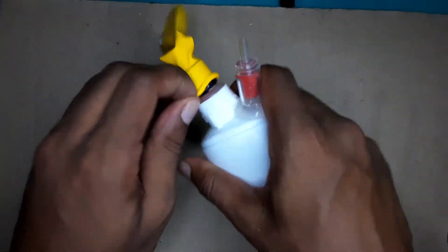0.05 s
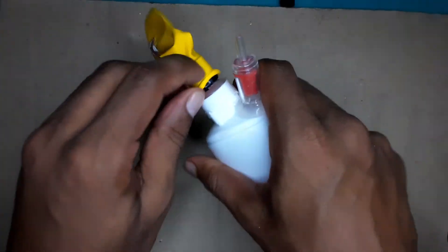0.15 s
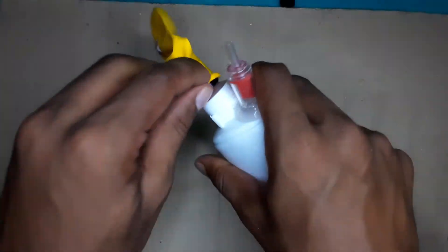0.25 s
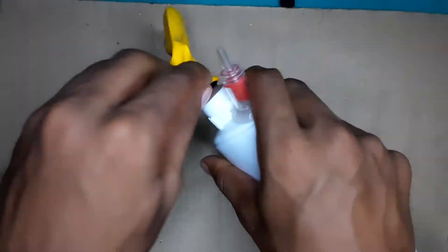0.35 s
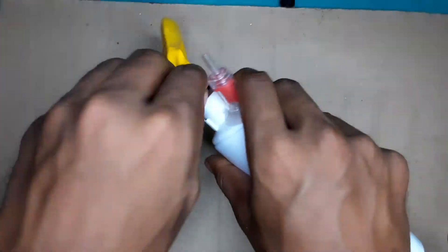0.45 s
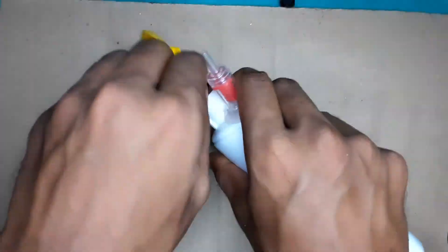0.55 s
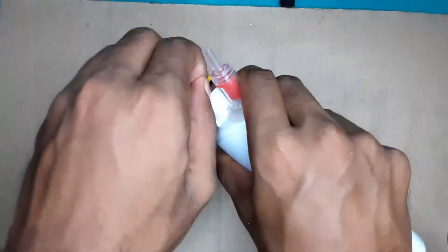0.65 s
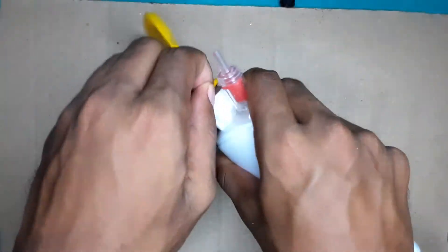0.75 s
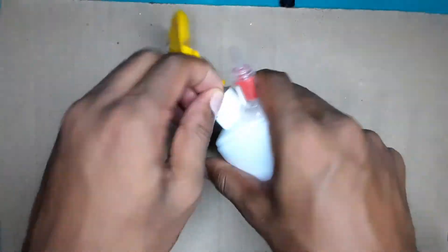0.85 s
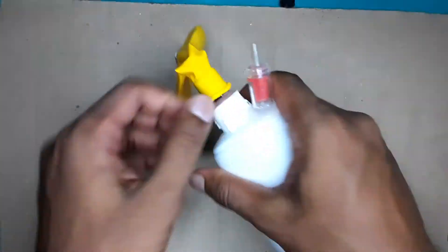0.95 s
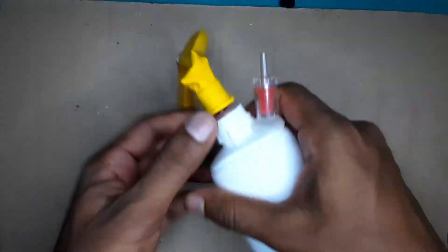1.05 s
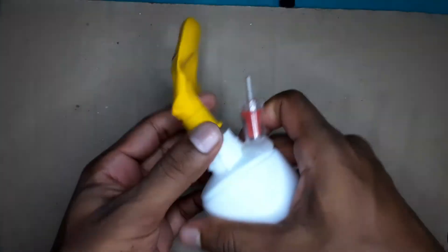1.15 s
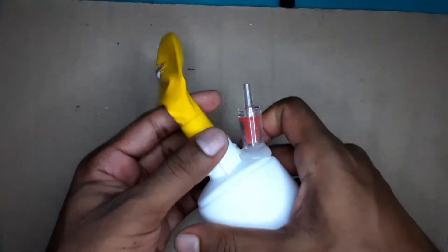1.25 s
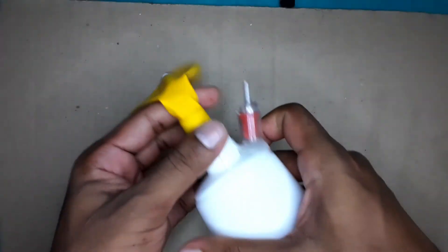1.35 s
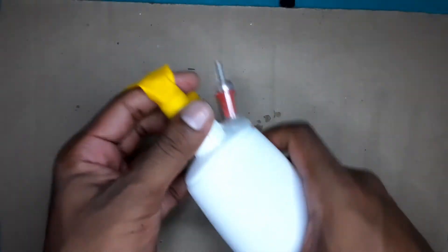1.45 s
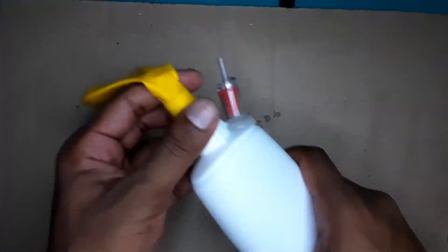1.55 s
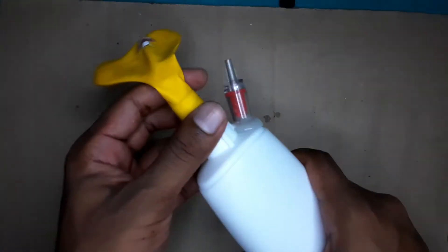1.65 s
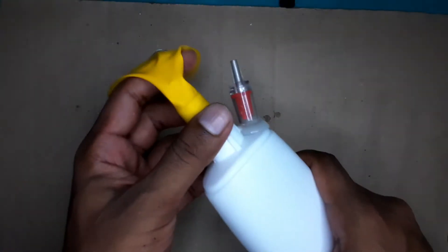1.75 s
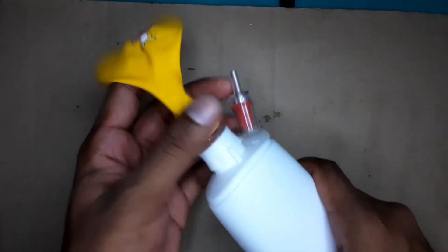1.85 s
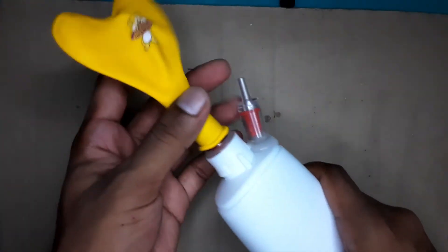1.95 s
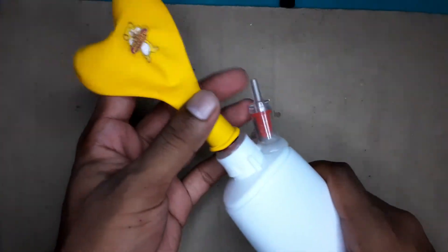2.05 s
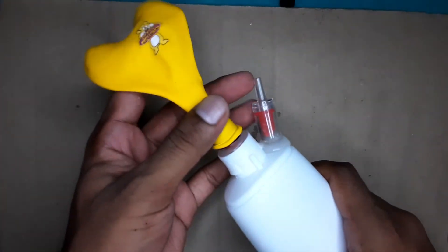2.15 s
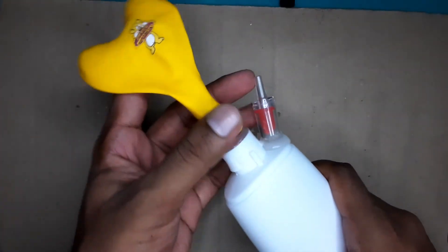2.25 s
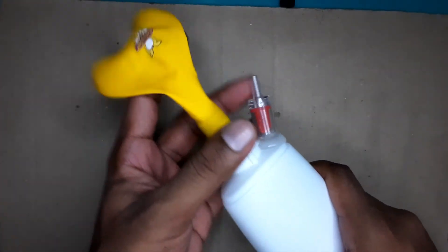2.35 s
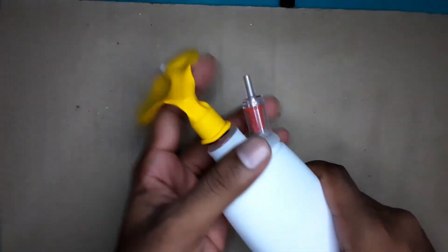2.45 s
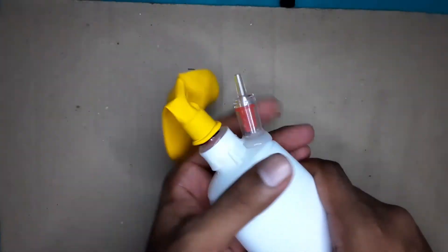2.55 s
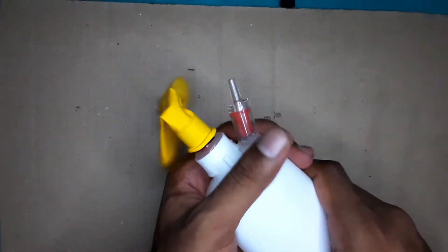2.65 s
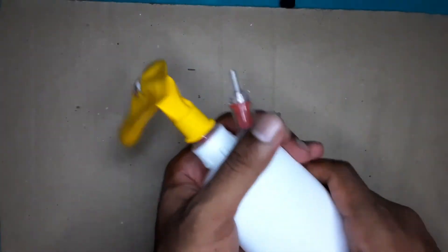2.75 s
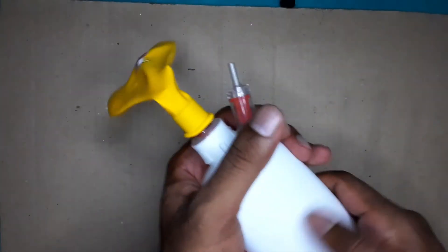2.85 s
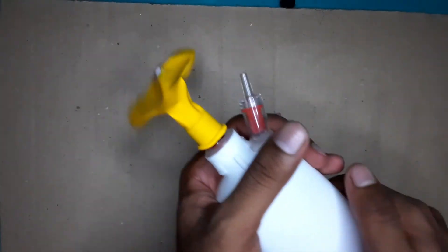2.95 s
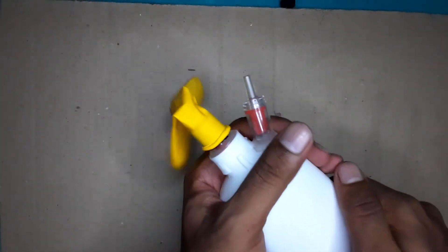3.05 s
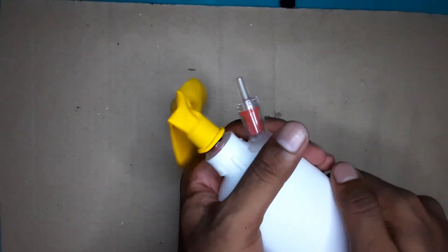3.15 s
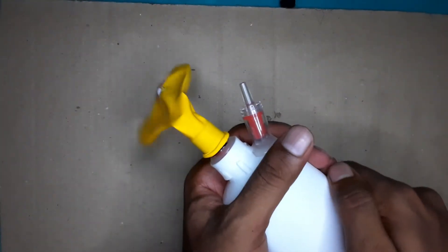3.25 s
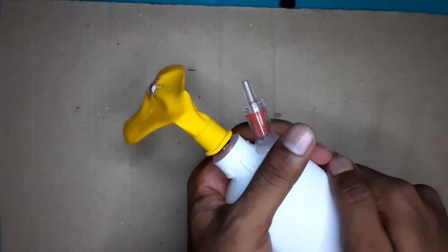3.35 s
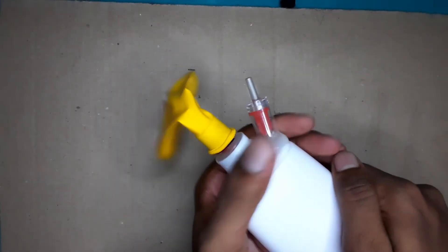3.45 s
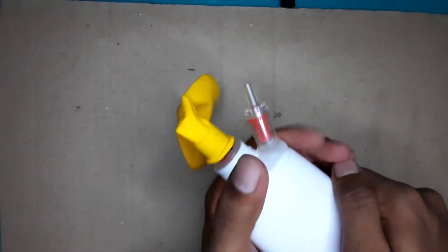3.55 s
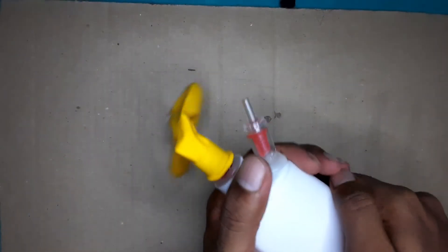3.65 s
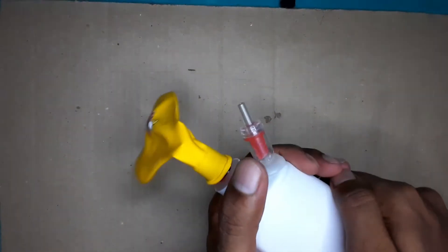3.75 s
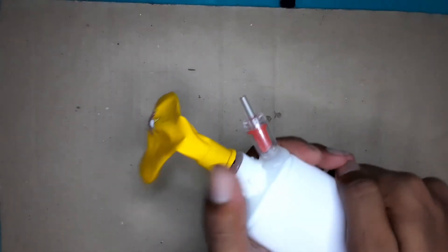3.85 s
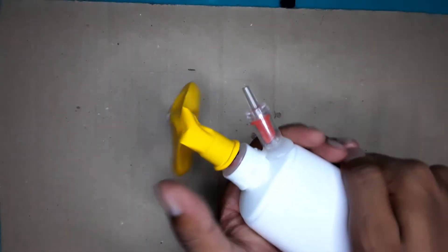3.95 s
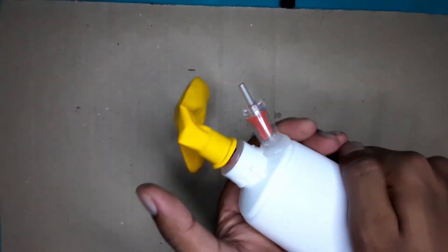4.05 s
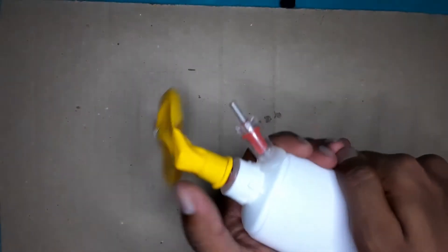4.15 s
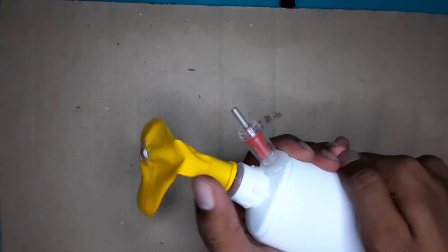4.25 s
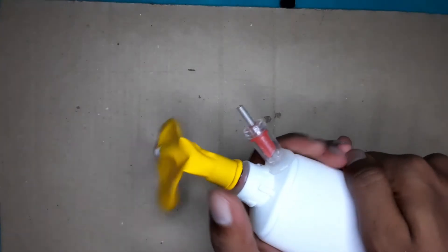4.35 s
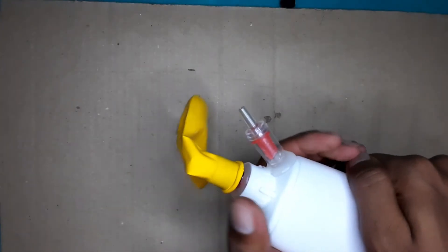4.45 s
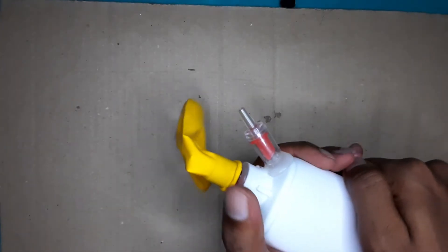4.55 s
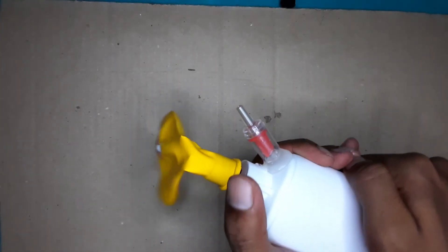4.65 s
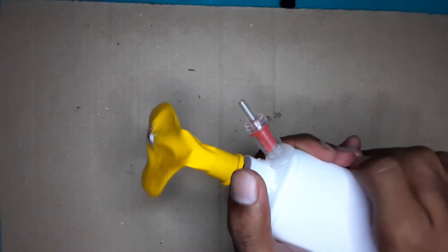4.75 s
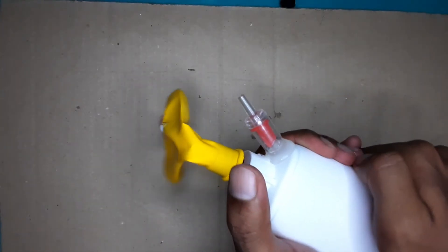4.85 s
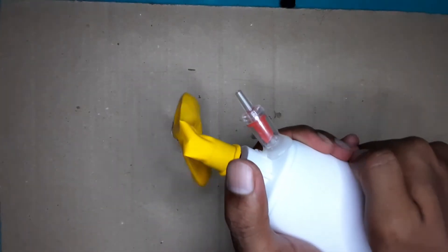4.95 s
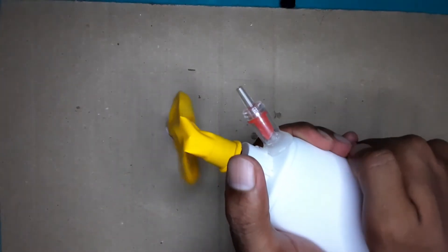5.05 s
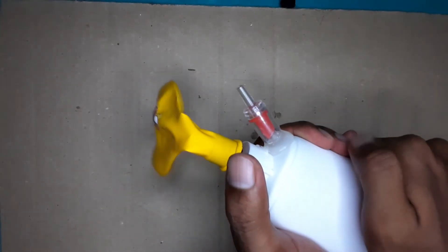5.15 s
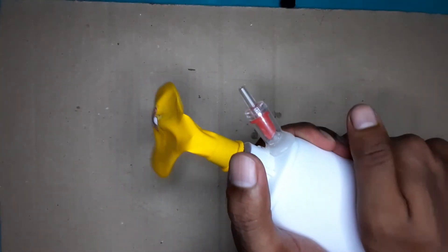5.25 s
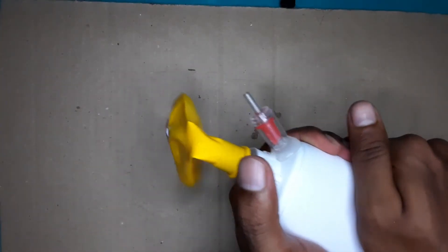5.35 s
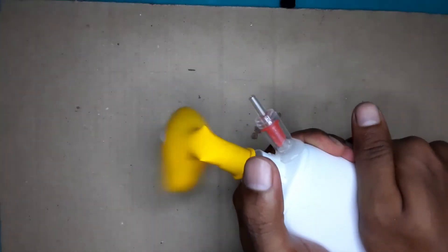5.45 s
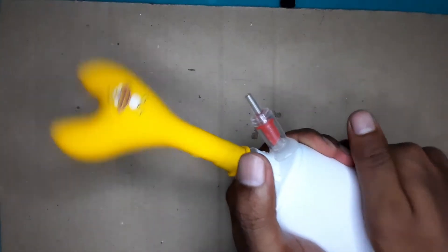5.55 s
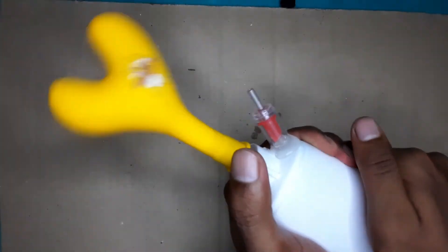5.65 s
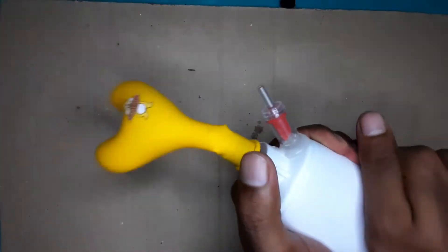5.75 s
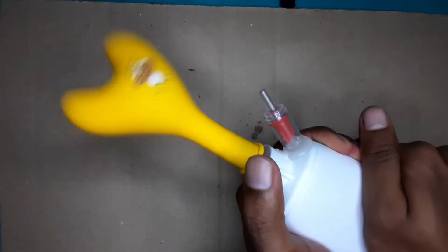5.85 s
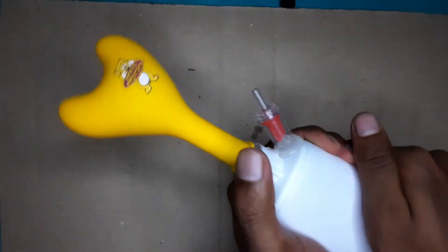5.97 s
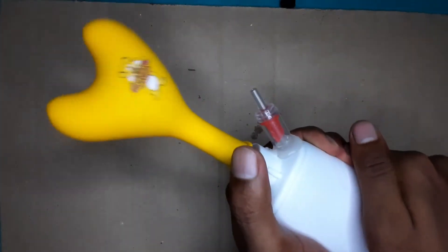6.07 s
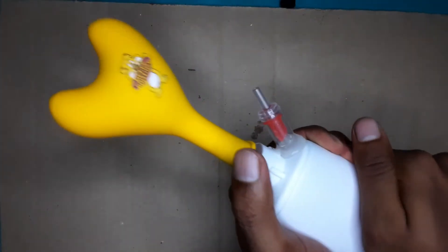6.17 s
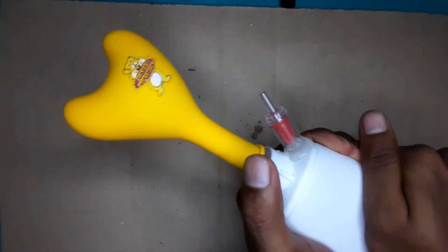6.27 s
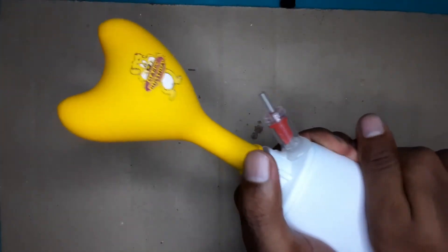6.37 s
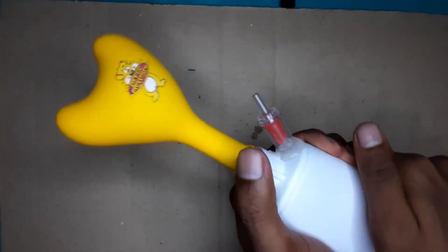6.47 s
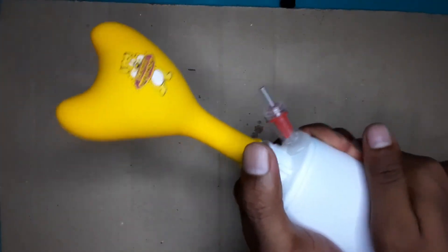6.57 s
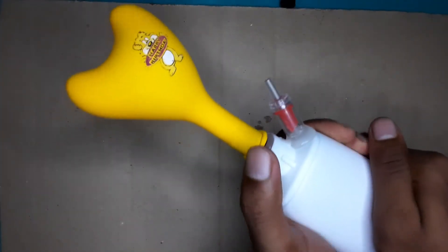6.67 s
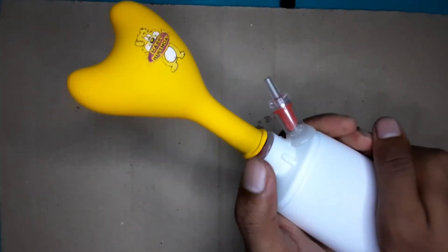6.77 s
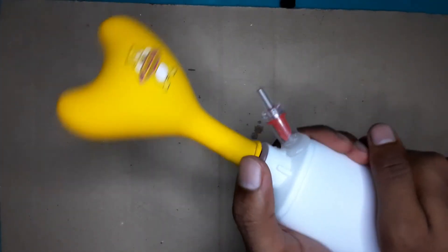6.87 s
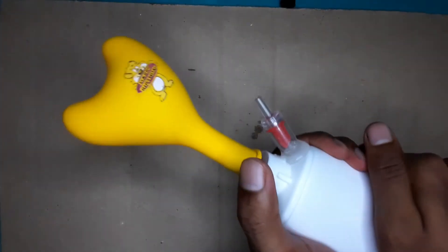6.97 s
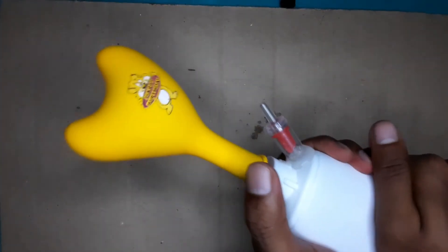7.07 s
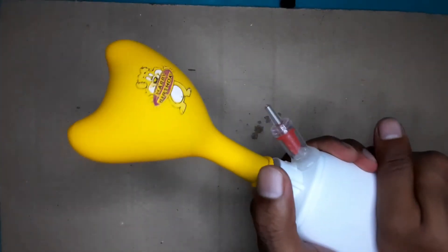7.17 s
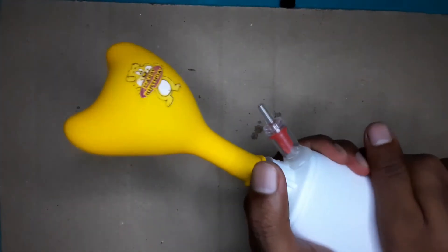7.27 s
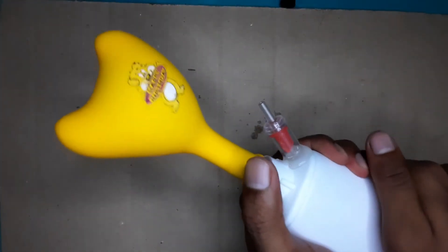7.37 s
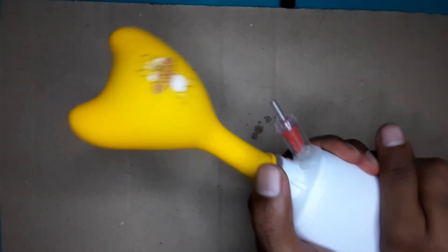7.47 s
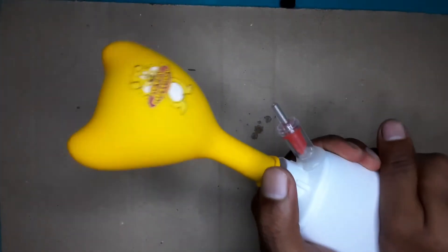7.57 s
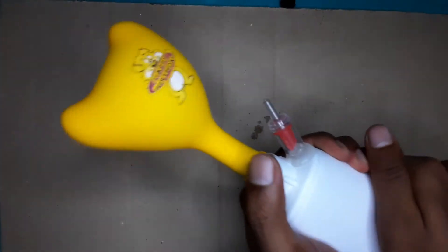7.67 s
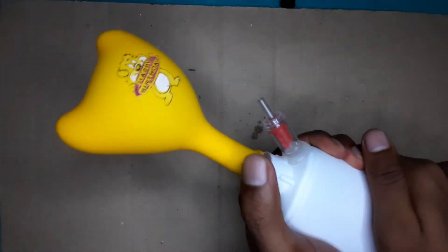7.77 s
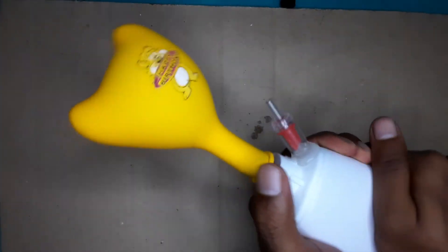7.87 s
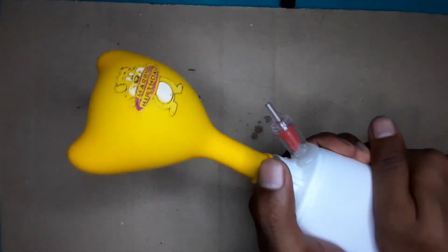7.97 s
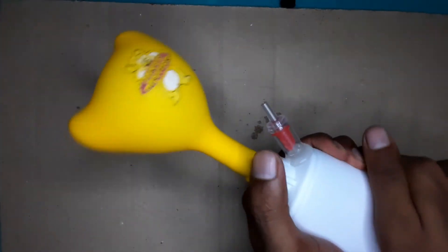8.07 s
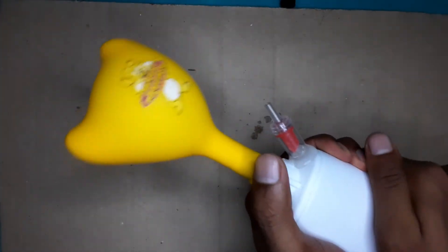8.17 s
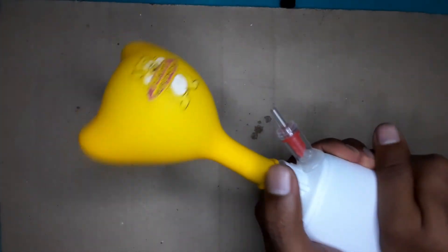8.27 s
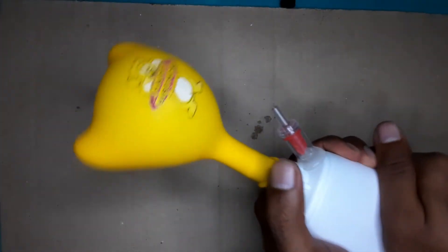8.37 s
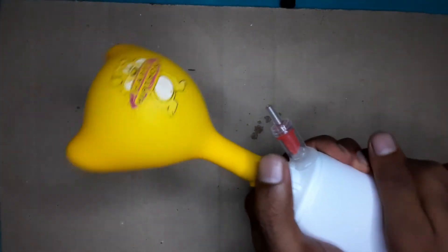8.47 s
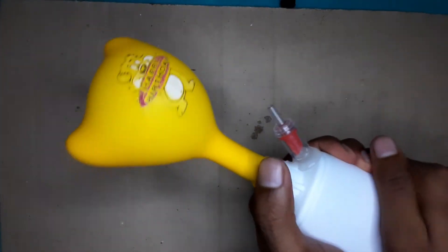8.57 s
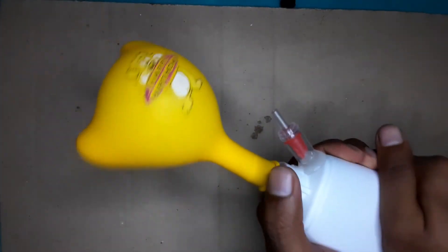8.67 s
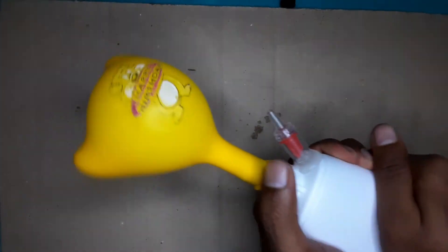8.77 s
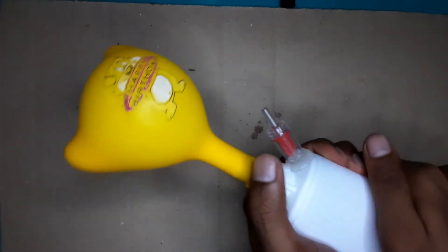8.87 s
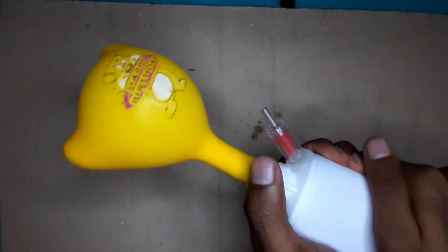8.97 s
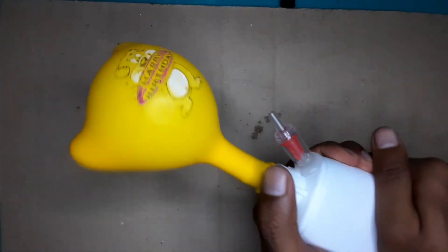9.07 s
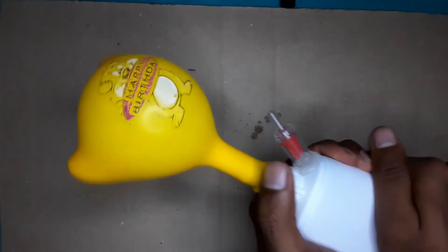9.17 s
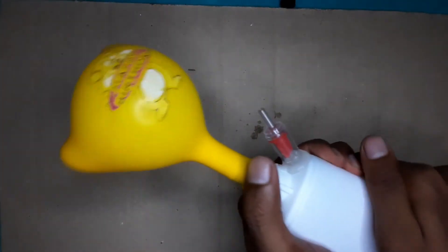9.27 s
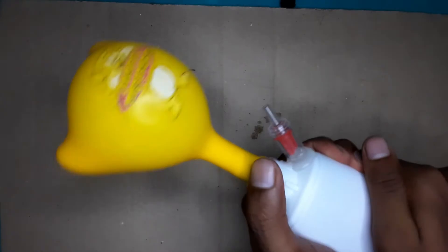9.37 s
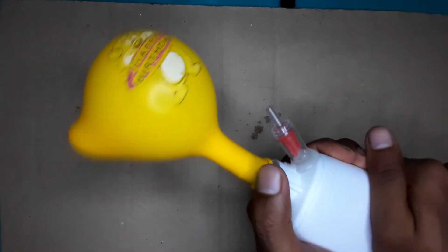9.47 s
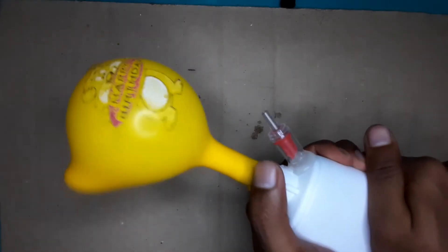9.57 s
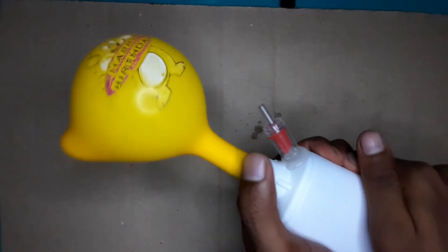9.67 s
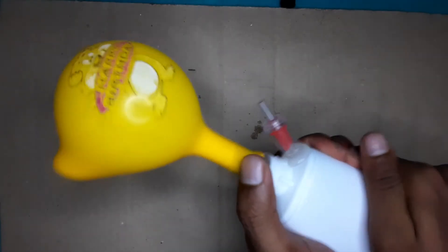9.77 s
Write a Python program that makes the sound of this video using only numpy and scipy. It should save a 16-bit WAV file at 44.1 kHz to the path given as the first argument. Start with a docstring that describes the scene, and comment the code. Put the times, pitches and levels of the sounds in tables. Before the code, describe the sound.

Fingers rub and creak a rubber balloon onto a plastic bottle, then repeated squeezes hiss air into it over a faint fan hum.

```python
"""Fingers rub, creak and click on rubber and plastic, close by in a small room where a fan hums.
They work a toy balloon onto a squeeze bottle's nozzle, and stick-slip friction makes the skin rasp.
Then ten squeezes hiss into the balloon: each turbulent jet is coloured by resonances and echoes.
After each one the bottle springs back and sucks air through its inlet valve with a thin whistle;
the plastic wall knocks and crinkles as it buckles."""
import sys
import numpy as np
from scipy import signal
from scipy.fft import rfft, irfft, next_fast_len
from scipy.io import wavfile
from scipy.ndimage import map_coordinates

SR = 44100
rng = np.random.default_rng(int(sys.argv[2]) if len(sys.argv) > 2 else 0)


def generate_wav(signal):
    """Clip the signal to [-1, 1] and save it as 16-bit WAV at the path in sys.argv[1]."""
    frames = np.transpose(np.atleast_2d(signal))
    scaled = np.clip(frames, -1, 1) * 32767
    pcm = np.round(scaled).astype(np.int16)
    wavfile.write(sys.argv[1], SR, pcm)


N = 432621
TIME = np.arange(N) / SR

# Levels are relative within each source.
# squeezes after the first puff: t/s, length/s, level/dB, edge tone f/Hz, valve slit f/Hz,
# neck level/dB, nozzle level/dB, echo delay/s, refill level/dB, wall knock level/dB
SQUEEZES = [ (5.856, .096, -38.5, 7300, 11500, -1.5, 2.5, 0.00086, -48, -60),
            (6.307, 0.087, -37.5, 7800, 11150, -7.5, -3.5, 0.001, -50, -62),
            (7.158, 0.092, -37, 6020, 11200, -11, -6, 0.001, -49.5, -59),
            (7.556, 0.09, -37, 7600, 11060, -2, 3, .001112, -48.5, -67),
            (7.925, .09, -36, 9060, 11300, -6, 0.5, 0.00061, -46.5, -60),
            (8.31, .094, -35.5, 9200, 11160, -1, 2.5, 0.00063, -47, -55.5),
            (8.708, .088, -34.5, 9160, 11000, -5.5, 1, 0.000624, -47, -54.5),
            (9.098, 0.094, -34.5, 7300, 11170, 1.5, -3, .000732, -48, -56),
            (9.52, .099, -35, 8900, 11400, -4, -1.5, 0.00064, -48.5, -58)]
# resonances: f/Hz, width/Hz, level/dB
OUTLET_MODES = [(1280, 200, -20), (1690, 220, -12), (4150, 130, -8), (4520, 200, -13), (10300, 130, -7),
                (12900, 150, -8), (15300, 300, -9)]  # outlet valve
INLET_MODES = [(1264, 140, -9), (1630, 220, -9.5), (2462, 47, -9), (7070, 313, 0), (10840, 210, 2.5),
               (13150, 1030, -5.5)]  # inlet valve
FOLD_MODES = [(1720, 98, 0.5), (2190, 370, -2.5), (3440, 280, -1), (4090, 220, 2), (4960, 280, -5.5),
              (6020, 110, 1), (8230, 220, -4.5), (11000, 180, -1), (11900, 200, -2.5)]  # pockets in the limp balloon
RUBBER_MODES = [(2300, 240, 0.5), (2610, 160, -0.5), (3620, 245, -0.5), (5150, 860, -0.5), (7280, 350, -2)]  # rubber under the fingers
BOTTLE_MODES = [(2140, 230, 0.5), (3510, 250, 2), (5700, 820, -2), (7000, 450, 0.5)]  # rubbed bottle
# broad noise spectra: f/Hz, level/dB
JET_SPECTRUM = [(350, -39.5), (750, -60), (1200, -21), (1900, -19.5), (2500, -32.5), (3300, -12),
                (5200, -18.5), (6600, -22.5), (7600, -16.5), (9500, -17.5), (11400, -3.5), (14000, -14),
                (16000, -21)]  # turbulence at the outlet
PUFF_SPECTRUM = [(350, -11.5), (800, -24), (1200, -16), (2700, -17), (5500, -11), (6900, -12.5), (9000, -8),
                 (13500, -7.5), (15800, -7.5)]  # air entering the limp balloon
SUCTION_SPECTRUM = [(350, -9), (800, -24), (1500, -10), (2800, -24), (3500, -15.5), (6400, -13.5),
                    (7500, -6.5), (8100, -28), (9600, -18.5), (11000, -30), (12000, -31), (14500, -14),
                    (16000, -11)]  # air returning to the bottle
SKIN_SPECTRUM = [(400, -2), (650, 0.5), (900, -37), (1900, -19.5), (2950, -18), (4300, -3.5), (7300, 2),
                 (8300, -14), (12000, -3.5), (15800, -9)]  # sliding skin
CRINKLE_SPECTRUM = [(200, -7), (400, 7), (650, 8), (1000, -2), (1900, 4), (2800, 2.5), (3600, 7.5),
                    (6500, -5), (8500, -22), (15000, -6)]  # denting plastic
RUMBLE_SPECTRUM = [(22, -49.5), (33, -38), (47, -8.5), (62, -12), (85, -9), (120, -8.5), (155, -10),
                   (180, -14.5), (260, -15), (400, -21), (600, -30.5), (800, -43.5), (1500, -52.5),
                   (3000, -89)]  # room rumble
HISS_SPECTRUM = [(700, 2.5), (1500, -2.5), (3000, -7.5), (7000, -11), (8300, -19), (9500, -19),
                 (11000, -7.5), (15500, -6)]  # steady background hiss
# envelopes: t/s, level/dB
PUFF_ENVELOPE = [(5.385, -75), (5.403, -58), (5.421, -45), (5.45, -40.5), (5.478, -35.5), (5.505, -44),
                 (5.53, -54.5), (5.56, -85)]  # the limp balloon fills
DRONE_ENVELOPE = [(0, -71), (3, -68), (4.6, -63.5), (9.8, -61.5)]  # lowest tone of the hum
# noise bursts: t/s, length/s, level/dB
WISPS = [(6.98, .075, -76), (5.368, .045, -66)]  # a light press or release passes air through the inlet
SLIDES = [(0.089, 0.12, -68.5), (.3, .08, -87), (0.622, 0.078, -72), (0.722, 0.09, -78.5),
          (0.903, 0.021, -58.5), (1.136, 0.12, -82), (1.235, 0.33, -79), (1.42, 0.11, -63.5),
          (1.525, 0.07, -57.5), (1.819, .15, -78.5), (2.02, .1, -88), (2.687, 0.098, -80.5),
          (2.777, 0.089, -64), (2.829, 0.056, -61), (2.88, .05, -72), (2.995, .1, -77.5),
          (3.24, 0.18, -76.5), (3.465, 0.073, -73), (3.639, 0.089, -77.5), (3.927, .17, -82),
          (4.201, .08, -76.5), (4.402, 0.12, -77.5), (4.649, 0.2, -79.5), (6.702, 0.14, -74.5),
          (6.783, .05, -66)]  # finger strokes on balloon and bottle
CRINKLES = [(2.827, 0.04, -60), (6.128, 0.017, -61.5), (6.54, 0.051, -54), (6.599, .02, -63.5),
            (6.67, .025, -72.5)]  # the thin wall dents
# creaks of gripped rubber: t/s, length/s, level/dB, mid-stroke f/Hz
CREAKS = [(0.122, 0.045, -67.5, 1700), (0.444, 0.035, -72.5, 2380), (.62, 0.077, -73, 1600),
          (.745, .08, -74, 1600), (0.907, 0.015, -63, 1650), (1.847, 0.091, -74, 2100),
          (2.788, .015, -55, 2130), (2.823, 0.052, -63, 2090), (3.695, 0.029, -78, 2050),
          (4.238, 0.024, -72.5, 2060), (4.358, .015, -70, 2040), (4.472, 0.027, -73, 2040),
          (4.66, 0.039, -69.5, 1930), (6.791, 0.043, -67, 1980)]
# snaps of rubber and plastic: t/s, level/dB, ring f/Hz, ring gain/dB
SNAPS = [(0.1978, -57, 4940, 6.5), (0.309, -58.5, 4090, -2), (0.3714, -55.5, 7100, -15),
         (0.621, -59, 5450, 2), (0.629, -55, 5360, 4), (0.651, -52.5, 5340, 6), (0.6699, -53.5, 5450, 1),
         (0.7258, -54, 2220, -2), (0.776, -54, 1600, -0.5), (0.8131, -55, 1520, -10),
         (0.9098, -50, 7550, -3), (0.921, -54.5, 1630, 5), (2.6956, -51.5, 6960, -3),
         (2.7937, -38, 2200, -1), (2.8439, -55, 7070, -6), (3.6973, -48, 2060, -4.5),
         (4.2644, -54, 2120, -1), (4.366, -47.5, 7050, -6), (4.4257, -54.5, 7080, -5),
         (4.4464, -51, 5600, -6), (5.5755, -44, 6820, -17), (6.2337, -48, 5250, -6),
         (6.5725, -43, 4080, -6), (6.7955, -54.5, 1870, 0), (6.8091, -48.5, 1930, -2.5),
         (6.9214, -61, 6600, -4)]
# the wall buckles under the grip: t/s, level/dB, f/Hz
BUCKLES = [(2.793, -55, 448), (6.135, -58, 363), (6.577, -59, 397), (7.874, -62.5, 450), (9.463, -59, 317)]
# fan tones: f/Hz, level/dB
FAN_TONES = [(100.3, -73), (113.7, -71), (126.5, -60.5), (137.3, -68.5), (198.5, -73.5), (202.5, -74.5),
             (206.6, -74), (303.5, -75), (379.8, -79.5)]
# reverberation of the room: f/Hz, T60/s
ROOM_T60 = [(200, 1), (2000, 0.33), (6000, 0.3), (15000, 0.32)]


def squeeze_jets(rise_s=0.02, fall_s=0.012, flutter_db=0.92, swell_db_per_s=16):
    """Source and filter: a fluttering turbulent jet excites resonances of valve, nozzle and neck."""
    out, t = np.zeros(N), np.arange(SR // 4) / SR
    for k, (start, length, db, edge_hz, slit_hz, neck_db, nozzle_db, echo_s, _, _) in enumerate(SQUEEZES):
        neck_hz = 4620 - 69 * k  # the neck rings lower with each squeeze
        tilt_db_per_octave = -2.07 + 0.31 * k  # the fuller balloon brightens the jet
        modes = list(OUTLET_MODES) + [(edge_hz, 130, -8), (slit_hz, 330, 0)]
        modes += [(neck_hz, 110, neck_db), (3470, 160, nozzle_db)]
        tilt = lambda hz: amp(tilt_db_per_octave * np.log2((hz + 300) / 6000))
        jet = noise(lambda hz: colour(JET_SPECTRUM, modes, hz) * tilt(hz), len(t))
        flow = np.clip(t / rise_s, 0, 1) ** 1.3 * np.exp(-np.maximum(t - length, 0) / fall_s)
        unsteady_db = flutter_db * wobble(415, len(t)) + 0.32 * wobble(55, len(t))
        pressure_db = db + swell_db_per_s * (t - length / 2) + unsteady_db
        add(out, start, flow * amp(pressure_db) * balloon_echoes(jet, echo_s, reflection=-0.45))
    return amp(-3.5) * out


def first_puff(flap_db=1.4, ring_s=5.53, ring_hz=4320, ring_db=-55):
    """Amplitude modulation: unfolding rubber flaps and roughens the hiss; the neck then rings briefly."""
    hiss, size = np.zeros(N), SR // 4
    jet = noise(lambda hz: colour(PUFF_SPECTRUM, FOLD_MODES, hz), size)
    jet = balloon_echoes(jet, delay_s=0.001, reflection=0.083)
    add(hiss, PUFF_ENVELOPE[0][0], unit(jet * amp(flap_db * wobble(506, size))))
    ring = noise(lambda hz: band(hz, ring_hz, 70)) * np.exp(-((TIME - ring_s) / 0.02) ** 2)
    return amp(curves(PUFF_ENVELOPE)[0]) * hiss + amp(ring_db) * ring


def balloon_echoes(x, delay_s, reflection, growth_per_s=0.33):
    """Comb filtering: echoes interfere, and the comb slides down as the swelling lengthens their paths."""
    n = np.arange(len(x))
    echo = lambda delay: map_coordinates(x, [n - delay * (SR + growth_per_s * n)], order=3)
    bounces = reflection * echo(delay_s) + reflection ** 2 * echo(2 * delay_s)
    strays = sum(rng.choice([-1, 1]) * echo(delay) for delay in rng.uniform(0.0012, 0.0035, 3))
    return unit(x + bounces + 0.29 * strays)


def refills(lag_s=0.162, rise_s=0.057, hold_s=0.086, fade_db=34, whistle_hz=10800, sag_hz_per_s=900):
    """Elastic recoil sucks air through the inlet, whose whistle sags in pitch as the flow slackens."""
    out, t = np.zeros(N), np.arange(SR // 3) / SR
    after_puff = (5.572, 0.24, -47)
    after_squeezes = [(start + lag_s, 0.25, db) for start, *_, db, _ in SQUEEZES]
    for start, length, db in [after_puff] + after_squeezes:
        hiss = noise(lambda hz: colour(SUCTION_SPECTRUM, INLET_MODES, hz), len(t))
        hiss *= amp(1.1 * wobble(200, len(t)))
        slackening = np.maximum(t - hold_s, 0) / (length - hold_s)
        flow = np.clip(t / rise_s, 0, 1) ** 0.55 * amp(-fade_db * slackening ** 1.38)
        pitch_hz = whistle_hz - sag_hz_per_s * (t - hold_s) + 70 * wobble(339, len(t))
        envelope = np.exp(-((t - length / 2) / 0.048) ** 2) * amp(-8 + 2.7 * wobble(48.5, len(t)))
        whistle = envelope * np.sin(2 * np.pi * np.cumsum(pitch_hz) / SR)
        add(out, start, amp(db) * (flow * hiss + whistle))
    return amp(-3.5) * out


def inlet_wisps(low_hz=7250, high_hz=10800, width_hz=130):
    """Resonance: a slow trickle of air sounds only two narrow modes of the inlet."""
    out = np.zeros(N)
    for start, length, db in WISPS:
        size = round(length * SR)
        air = noise(lambda hz: amp(-4) * band(hz, low_hz, width_hz) + band(hz, high_hz, width_hz), size)
        add(out, start, amp(db) * np.hanning(size) * air)
    return out


def finger_slides(regrip_s=2.55, seated_s=4.88):
    """Sliding friction: skin excites the modes of the rubber, then those of the bottle."""
    # between strokes the fingers fidget faintly until the balloon is seated
    envelope = amp(-88 + 0.5 * wobble(12)) * np.clip((seated_s - TIME) / 0.015, 0, 1)
    for start, length, db in SLIDES:
        add(envelope, start, amp(db) * finger_pressure(length))
    grain = slips(N)
    rubber = noise(lambda hz: colour(SKIN_SPECTRUM, RUBBER_MODES, hz))
    bottle = noise(lambda hz: colour(SKIN_SPECTRUM, BOTTLE_MODES, hz))
    return amp(-2.5) * envelope * unit(grain * np.where(TIME < regrip_s, rubber, bottle))


def rubber_creaks(width_hz=135, sag_hz_per_s=900, upper_ratio=1.38, upper_db=-6):
    """Stick-slip drives two narrow modes of the gripped rubber; they fall as its tension slackens."""
    out = np.zeros(N)
    for start, length, db, pitch_hz in CREAKS:
        pressure = finger_pressure(length)
        t = np.arange(len(pressure)) / SR
        phase = 2 * np.pi * np.cumsum(pitch_hz - sag_hz_per_s * (t - length / 2)) / SR
        mode = lambda ratio: np.sin(ratio * phase) * noise(lambda hz: band(hz, 0, width_hz), len(t))
        creak = unit(slips(len(t)) * (mode(1) + amp(upper_db) * mode(upper_ratio)))
        add(out, start, amp(db - 4.5) * pressure * creak)
    return out


def finger_pressure(length, attack_s=0.02, release_s=0.015):
    """Contact pressure of one stroke: a linear rise, a hold and an exponential release."""
    t = np.arange(SR // 2) / SR
    return np.clip(t / attack_s, 0, 1) * np.exp(-np.maximum(t - length, 0) / release_s)


def slips(size, grain_db=3, uneven_db=1.5):
    """Stick-slip modulation: a gain that jumps about as the skin advances in tiny slips."""
    return amp(grain_db * wobble(500, size) + uneven_db * wobble(60, size))


def snaps(crack_t60=0.021, ring_t60=0.03, damping_ratio=0.11):
    """Transient excitation: the rubber rim snaps and the plastic ticks, a crack with a damped ring."""
    out, t = np.zeros(N), np.arange(SR // 12) / SR
    for start, db, ring_hz, ring_db in SNAPS:
        crack = noise(lambda hz: colour(SKIN_SPECTRUM, RUBBER_MODES, hz), len(t))
        crack *= amp(-60 * t / crack_t60)
        burst = rng.standard_normal(len(t)) * amp(-60 * t / ring_t60)
        ring = filtered(burst, lambda hz: resonator(hz, ring_hz, 2 * damping_ratio * ring_hz) ** 2)
        ring /= np.abs(ring).max()
        add(out, start, amp(db) * (amp(-12.5) * crack + amp(ring_db - 7.5) * ring))
    return out


def wall_knocks(t60=0.053, attack_s=0.0019, rebound_lag_s=0.238, rebound_hz=315):
    """Buckling: the soft wall gives way, or pops out after a squeeze, and two damped modes knock."""
    out, t = np.zeros(N), np.arange(SR // 6) / SR
    envelope = amp(-60 * t / t60) * (1 - np.exp(-t / attack_s))
    rebounds = [(start + rebound_lag_s, db, rebound_hz) for start, *_, db in SQUEEZES]
    for start, db, hz in list(BUCKLES) + rebounds:
        modes = np.sin(2 * np.pi * hz * t) + 0.67 * np.sin(2 * np.pi * 1.45 * hz * t)
        add(out, start, amp(db + 7.5) * modes * envelope)
    return out


def wall_crinkles(grain_db=7.0):
    """Local buckling: a dent creeps through the thin wall in a short run of tiny cracks."""
    out = np.zeros(N)
    for start, length, db in CRINKLES:
        size = round(length * SR)
        plastic = noise(lambda hz: amp(along(CRINKLE_SPECTRUM, hz)), size)
        cracks = unit(plastic * amp(grain_db * wobble(454, size)))
        add(out, start, amp(db) * cracks * np.sqrt(np.hanning(size)))
    return out


def reverberation(x):
    """Convolution with the small room's diffuse tail, in which the bass lasts longest."""
    hz, t, spectra = signal.stft(rng.standard_normal(SR // 2), SR, nperseg=256)
    decay = amp(-60 * t / along(ROOM_T60, hz)[:, None])
    tail = signal.istft(spectra * decay, SR, nperseg=256)[1]
    delayed = np.pad(x, (200, 0))
    return signal.fftconvolve(delayed, tail / np.linalg.norm(tail))[:N]


def fan_hum(drone_hz=74.6, waver_db=1.5):
    """Superposition of a fan's tones, each wavering in phase and level; the lowest slowly swells."""
    def tone(hz):
        phase = 2 * np.pi * (hz * TIME + rng.random()) + 0.3 * wobble(2.5)
        return np.sqrt(2) * np.sin(phase) * amp(0.68 * wobble(3))
    drone_db = np.interp(TIME, *np.transpose(DRONE_ENVELOPE)) + waver_db * wobble(2)
    return sum(amp(db) * tone(hz) for hz, db in FAN_TONES) + amp(drone_db) * tone(drone_hz)


def room_noise(rumble_db=-61.5, hiss_db=-82.5):
    """Stationary noise: the low rumble of the room and a faint hiss."""
    rumble = noise(lambda hz: amp(along(RUMBLE_SPECTRUM, hz)))
    hiss = noise(lambda hz: amp(along(HISS_SPECTRUM, hz)))
    return amp(rumble_db) * rumble + amp(hiss_db) * hiss


def amp(db):
    """Amplitude ratio of a level in decibels."""
    return 10 ** (np.asarray(db) / 20)


def unit(x):
    """Normalisation to rms 1."""
    return x / np.sqrt(np.mean(x ** 2) + 1e-20)


def along(points, hz):
    """Interpolation of (f/Hz, value) points on a logarithmic frequency axis."""
    f, values = np.transpose(points)
    return np.interp(np.log(hz + 1), np.log(f + 1), values)


def curves(rows):
    """Interpolation of each level column over time, silent outside the rows."""
    times, *levels = np.transpose(rows)
    return [np.interp(TIME, times, db, left=-120, right=-120) for db in levels]


def wobble(rate, size=N):
    """Smooth random modulation: a spline through `rate` Gaussian knots a second."""
    knots = rng.standard_normal(int(size * rate / SR) + 4)
    return map_coordinates(knots, [np.arange(size) * rate / SR])


def filtered(x, response):
    """Linear filtering: the spectrum of x times a frequency response."""
    size = next_fast_len(len(x) + 8192)
    return irfft(rfft(x, size) * response(np.fft.rfftfreq(size, 1 / SR)), size)[:len(x)]


def noise(response, size=N):
    """Spectral shaping of white noise, at rms 1."""
    return unit(filtered(rng.standard_normal(size), response))


def band(hz, centre_hz, width_hz):
    """Lorentzian gain, halved at width_hz either side of the centre."""
    return 1 / (1 + ((hz - centre_hz) / width_hz) ** 2)


def colour(spectrum, modes, hz):
    """Gain of a broad spectrum and its resonance peaks, added in power."""
    power = sum((amp(db) * band(hz, f, width)) ** 2 for f, width, db in modes)
    return np.sqrt(power + amp(along(spectrum, hz)) ** 2)


def resonator(hz, centre_hz, width_hz):
    """Causal band-pass response of a damped oscillator."""
    return 1j * hz * width_hz / (centre_hz ** 2 - hz ** 2 + 1j * hz * width_hz)


def add(track, start, x):
    """Superposition of x on the track from `start` seconds."""
    part = track[max(round(start * SR), 0):][:len(x)]
    part += x[:len(part)]


def scene():
    """Direct sound of air, fingers and bottle, with weaker reverberation and the background, in mono."""
    background = fan_hum() + room_noise()
    direct = squeeze_jets() + first_puff() + refills() + inlet_wisps()
    direct += finger_slides() + rubber_creaks() + snaps() + wall_knocks() + wall_crinkles()
    return (direct + amp(-8.0) * reverberation(direct) + background)[None]


def record(dry):
    """Band limiting: the microphone passes nothing above 15.9 kHz."""
    return np.array([filtered(x, lambda hz: hz < 15900) for x in dry])


dry = scene()
out = record(dry)
generate_wav(out)
```